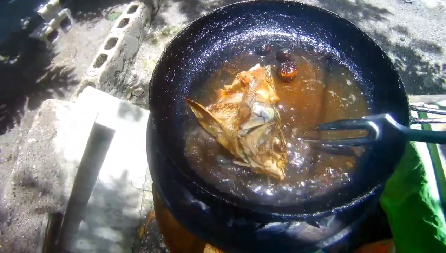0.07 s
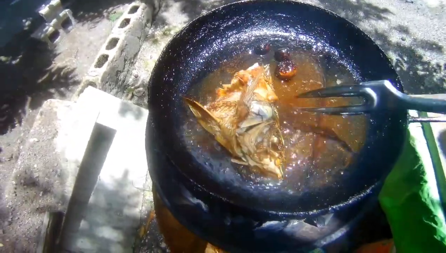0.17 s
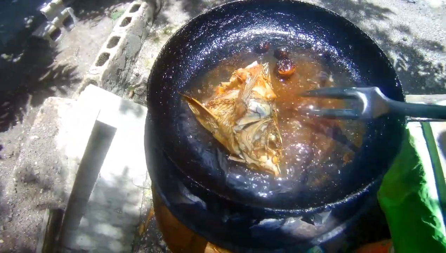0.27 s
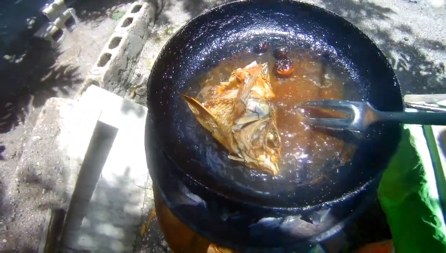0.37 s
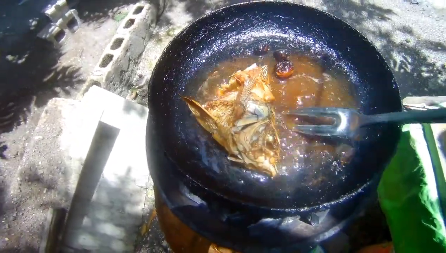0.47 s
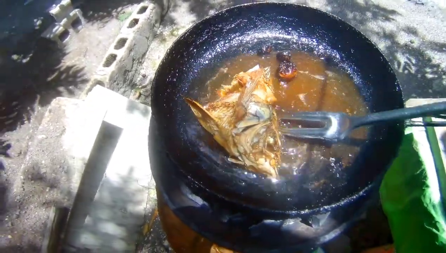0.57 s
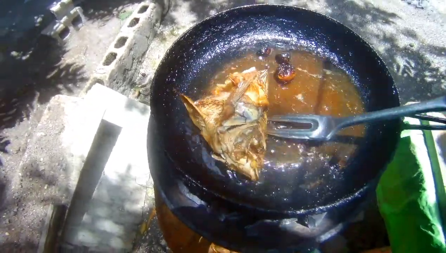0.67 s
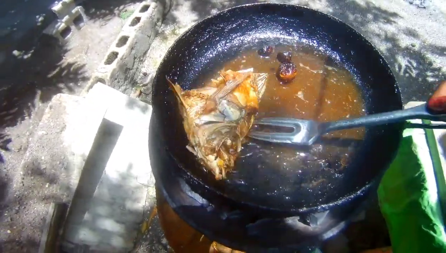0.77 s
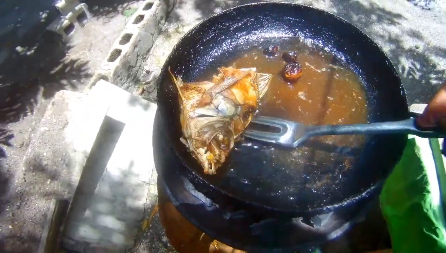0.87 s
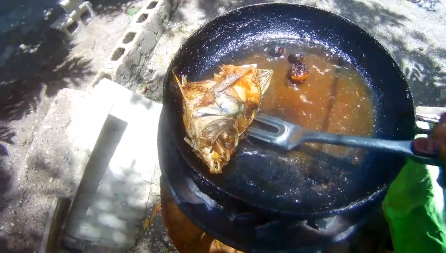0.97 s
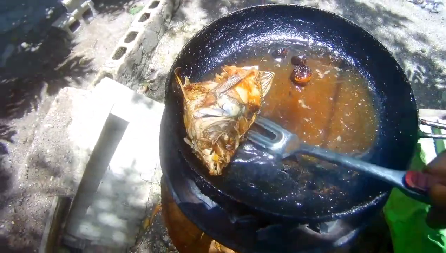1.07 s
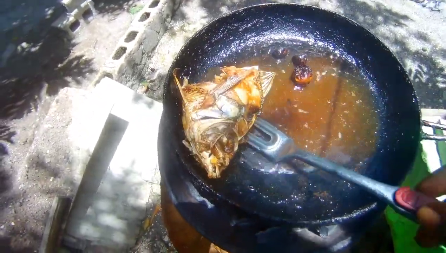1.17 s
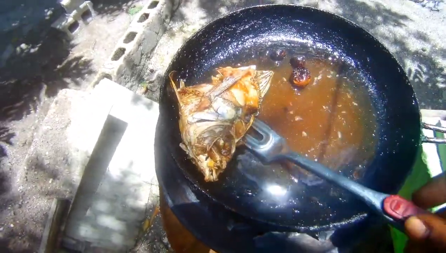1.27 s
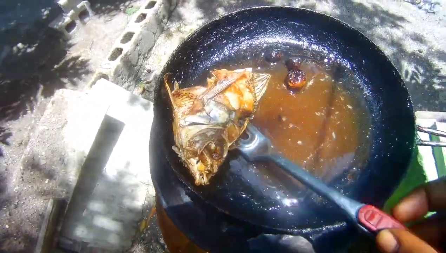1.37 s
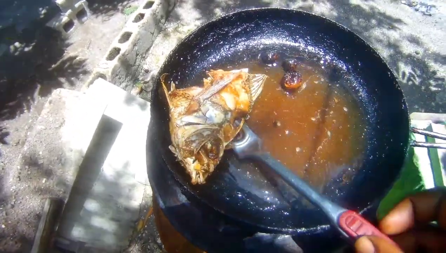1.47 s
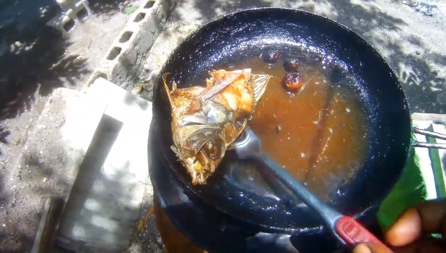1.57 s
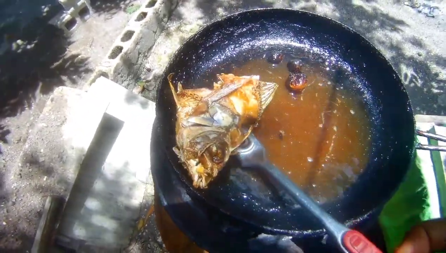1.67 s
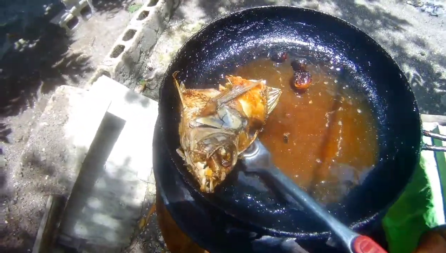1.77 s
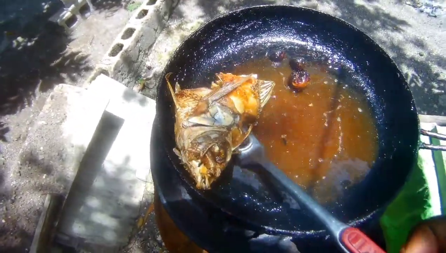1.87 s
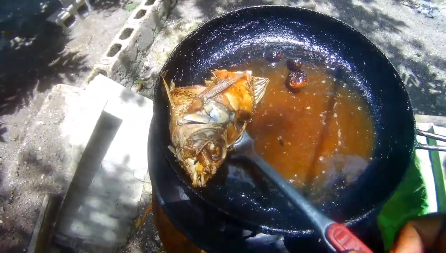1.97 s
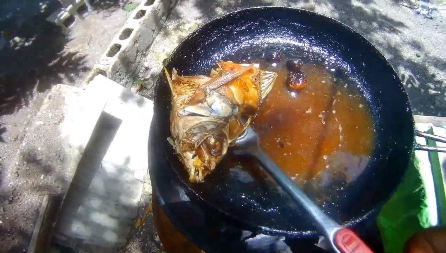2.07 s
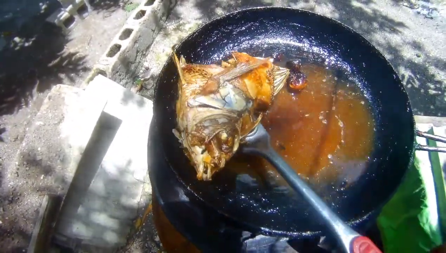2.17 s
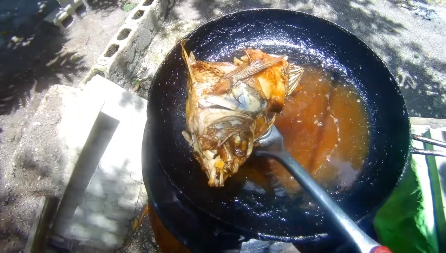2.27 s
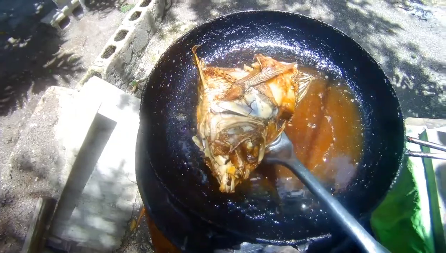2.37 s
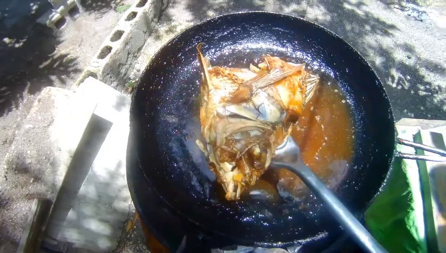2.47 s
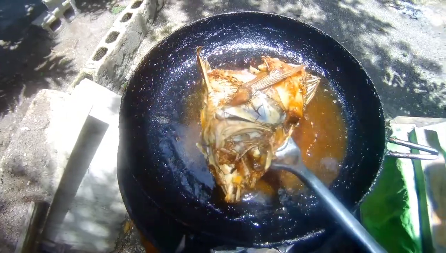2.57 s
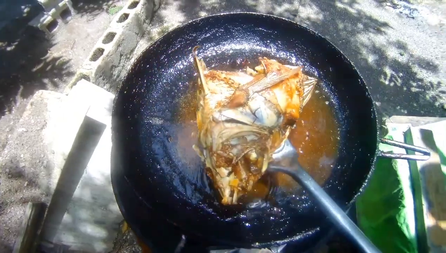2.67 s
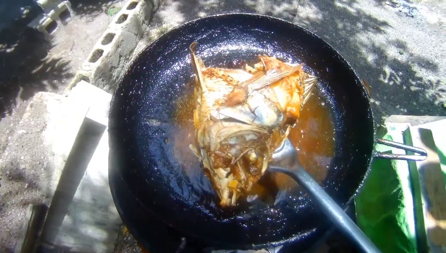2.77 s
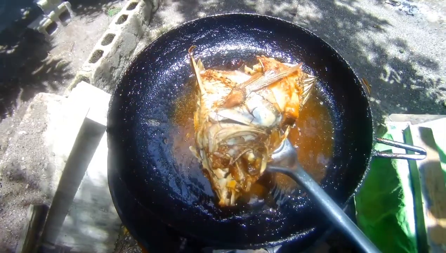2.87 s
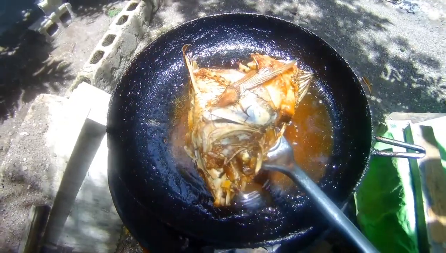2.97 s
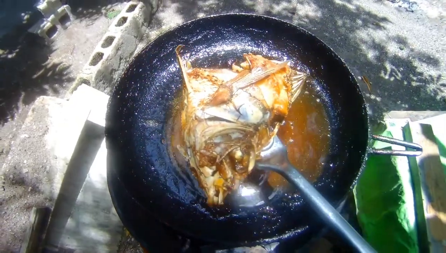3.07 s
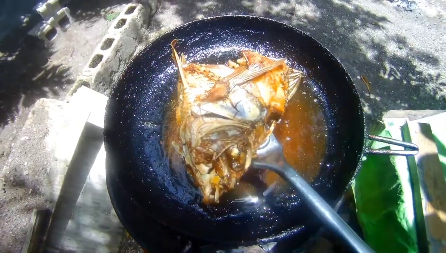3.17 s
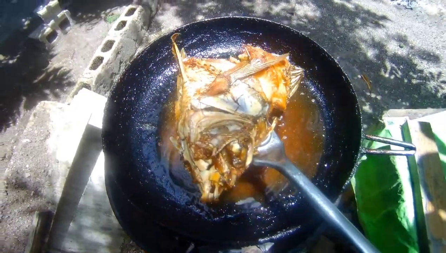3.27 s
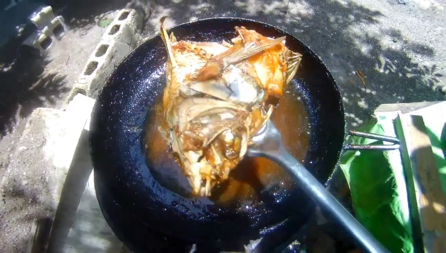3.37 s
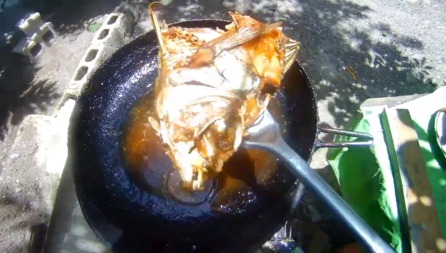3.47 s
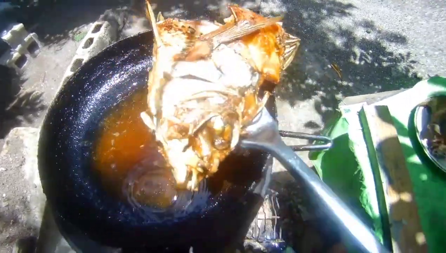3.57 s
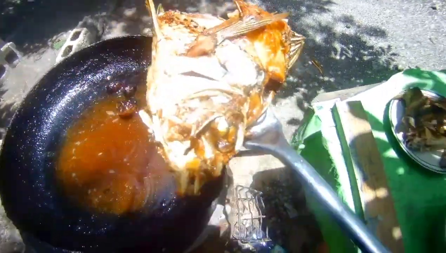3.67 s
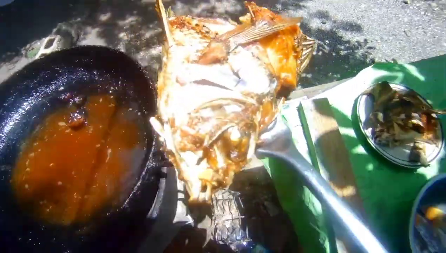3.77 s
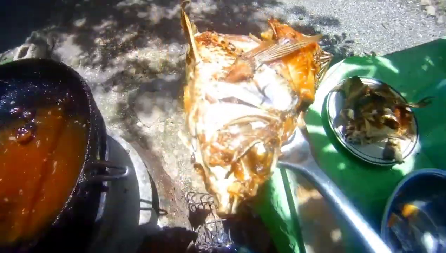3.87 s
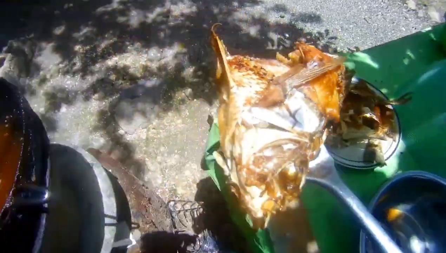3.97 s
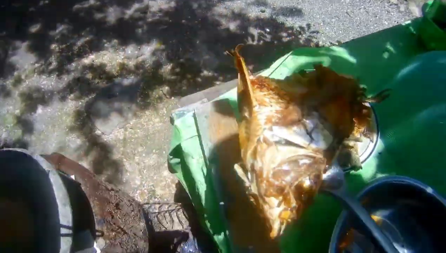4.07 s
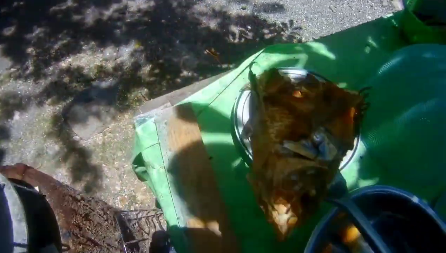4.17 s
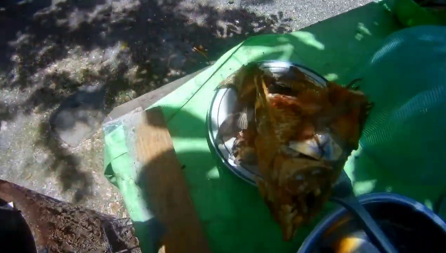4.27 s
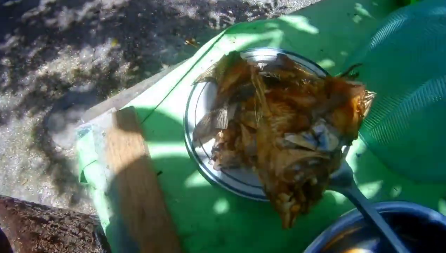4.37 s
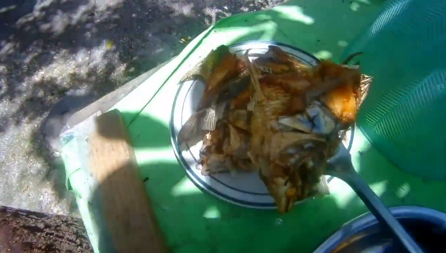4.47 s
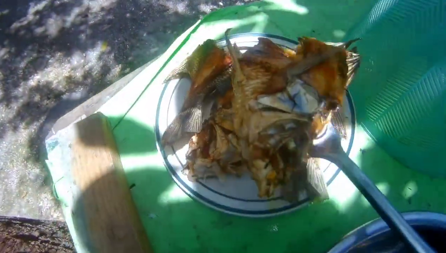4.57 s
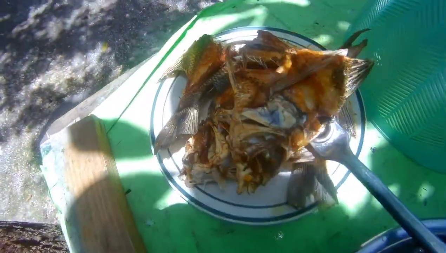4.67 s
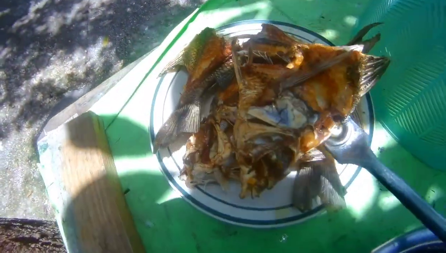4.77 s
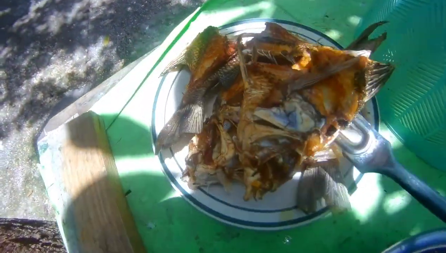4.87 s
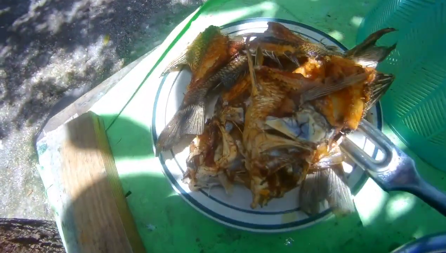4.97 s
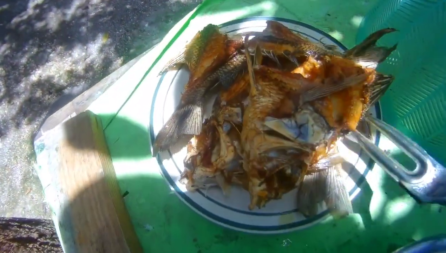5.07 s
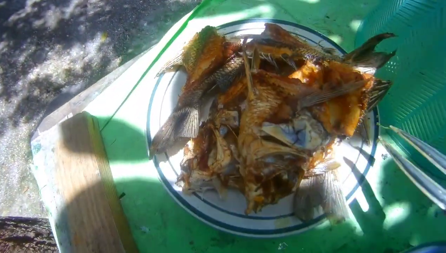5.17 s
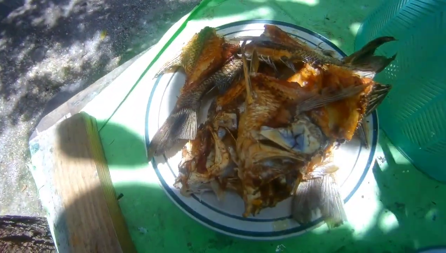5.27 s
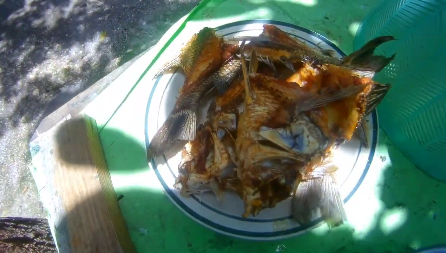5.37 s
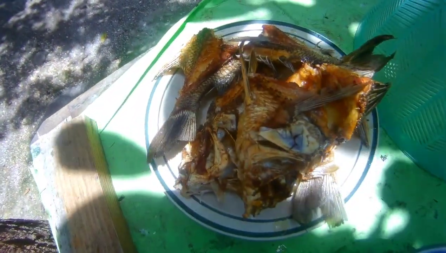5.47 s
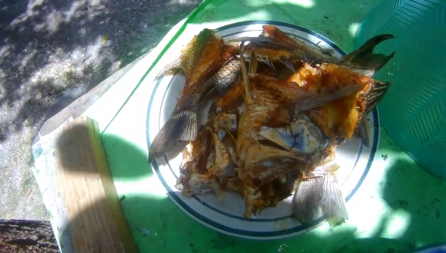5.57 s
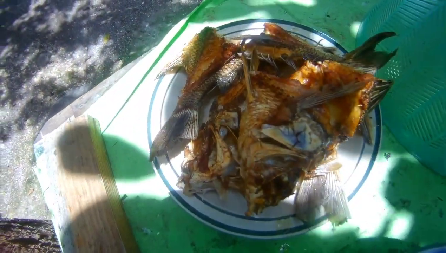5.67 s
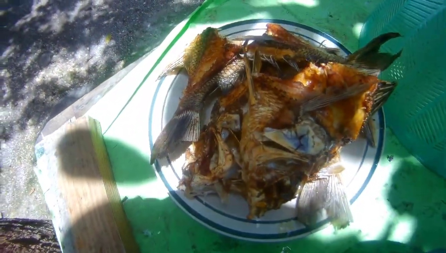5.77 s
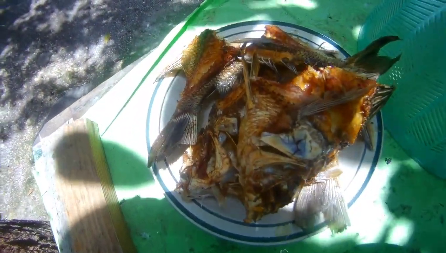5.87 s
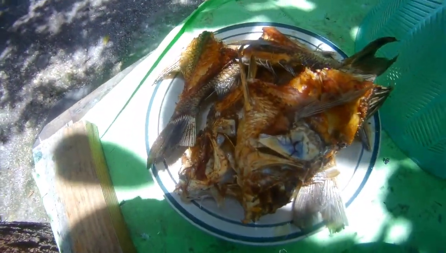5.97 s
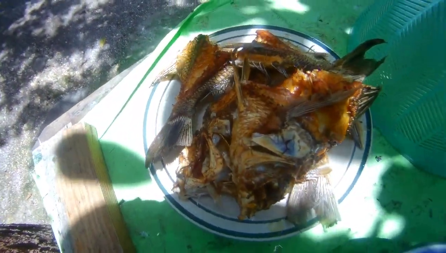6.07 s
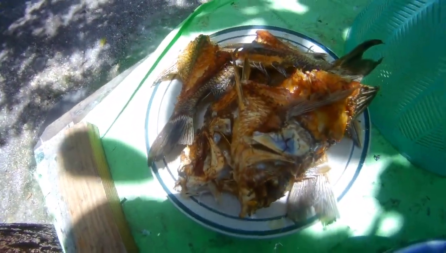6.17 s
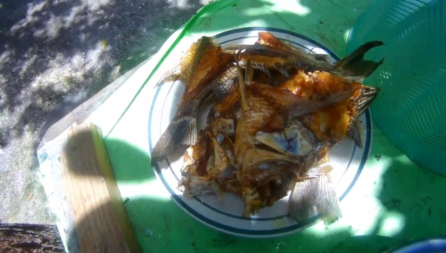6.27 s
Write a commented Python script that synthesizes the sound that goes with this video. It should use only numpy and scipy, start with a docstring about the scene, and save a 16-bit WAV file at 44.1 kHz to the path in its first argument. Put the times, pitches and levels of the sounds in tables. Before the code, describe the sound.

Close to a steel pan outdoors, hot oil fries a fish head with dense bright sizzle, sharp snaps and hollow bubbling pops. The boil weakens steadily as the fish is lifted on a fork and carried away. After a near-quiet gap with a tiny squeak, the crisp crust crunches and knocks lightly onto a plate, leaving faint open air and breeze.

```python
"""Outdoors, a fish head fries in a steel pan, is lifted out on a fork, carried away and laid on a plate.
The frying is thousands of damped sines in pitch bands, over noise; pops add snaps, cracks and hollow notes.
The plate knocks are short decaying modes with a noise rattle, and the crust crunches in the frying grains.
A faint squeak and a hum are wavering sines; the open air and the breeze's rumble are shaped noise."""
import sys
import numpy as np
from scipy import signal
from scipy.fft import rfft, irfft, next_fast_len
from scipy.io import wavfile
from scipy.ndimage import map_coordinates

SR = 44100
rng = np.random.default_rng(int(sys.argv[2]) if len(sys.argv) > 2 else 0)


def dump(signal):
    """Clip the signal to [-1, 1] and save it as 16-bit WAV at the path in sys.argv[1]."""
    limited = np.clip(np.atleast_2d(signal).T, -1, 1)
    pcm = np.round(limited * 32767).astype(np.int16)
    wavfile.write(sys.argv[1], SR, pcm)


N = 278712  # length in samples

# How hard the bubbles burst: start_s [s], big_db [dB], middle_db [dB], fine_spray_db [dB]
SIZZLE = [(0, -41.5, -31.5, -37), (.2, -39, -30.5, -37.5), (.65, -45, -39, -43), (1, -41.5, -35.5, -39),
          (1.3, -44.5, -37.5, -40), (1.47, -46.5, -37.5, -40), (1.6, -51, -43, -44),
          (1.85, -49.5, -45.5, -43), (2.2, -55.5, -47.5, -46), (2.55, -59.5, -46, -42.5),
          (2.9, -57, -48.5, -46), (3.25, -59, -49, -48.5), (3.45, -63.5, -56, -53),
          (3.8, -61.5, -57.5, -53.5), (4, -67, -58.5, -62), (4.3, -70.5, -67.5, -70),
          (5.2, -68, -64.5, -67.5), (6.32, -71, -66, -70)]
# Low gurgle in the deep oil: start_s [s], level_db [dB]
DEEP = [(0, -51), (.8, -51), (1.5, -58.5), (2.5, -61), (3.3, -62), (4, -76), (6.32, -80)]
# The crust crunches as the fish is laid down: start_s [s], middle_grain_level_db [dB]
CRUNCH = [(4.66, -65), (4.685, -54), (4.72, -49), (4.77, -51), (4.825, -46), (4.86, -57.5), (4.885, -46),
          (4.905, -57), (4.93, -48), (4.95, -56.5), (4.975, -49), (5.01, -59), (5.12, -64), (5.25, -73)]
# Pan bowl and microphone colour: pitch_hz [Hz], gain_db [dB]
BOWL_COLOUR = [(120, -20.5), (300, -21), (500, -16), (592, -8.5), (867, -12.5), (1270, -2), (1650, -4),
               (2390, -14.5), (3300, -8), (4200, 0), (6240, -7), (7200, -6.5), (8500, -23), (10800, -11.5),
               (13400, -27), (14800, -22.5), (15800, -21)]
# Loudest single bursts in the oil and cracks of the crust:
# start_s [s], snap_hz [Hz], snap_db [dB, relative], hollow_hz [Hz], hollow_db [dB]
POPS = [(.0322, 3970, -9.5, 1390, -35), (.0553, 4230, -14, 1290, -34), (.0655, 4020, -10, 1290, -30),
        (.0932, 4270, -17, 1400, -22), (.1142, 6500, -23, 1310, -11), (.1075, 4300, -10, 1270, -28),
        (.162, 4160, -10.5, 1500, -20), (.1688, 4270, -23, 1950, -13), (.2208, 5600, -19, 1320, -21),
        (.3556, 4380, -11.5, 1310, -17), (.4114, 4300, -10, 1490, -6.5), (.4653, 4500, -11.5, 1870, -37),
        (.495, 5040, -12, 610, -32), (.5277, 4200, -11.5, 1340, -9.5), (.5737, 4080, -12.5, 1410, -23),
        (.6749, 3960, -14, 1310, -32), (.7006, 4170, -15, 1340, -17), (.7328, 4200, -22, 700, -18.5),
        (.7364, 4200, -15.5, 1210, -34), (.7541, 4340, -12.5, 1770, -35), (.7953, 4690, -14, 1660, -30),
        (.8132, 4100, -24, 1750, -22), (.8369, 4080, -15, 700, -31), (.8455, 4000, -24, 1250, -16),
        (.8881, 3970, -20, 1200, -21), (.9246, 3970, -17, 1490, -27), (.9375, 4100, -26, 1600, -17),
        (.9541, 3900, -13, 1430, -22), (.9885, 4200, -26, 1930, -10.5), (1.0281, 4040, -11.5, 1700, -9.5),
        (1.0415, 4000, -24, 1500, -14), (1.0457, 3900, -19, 1600, -14), (1.1029, 3700, -15, 1640, -18),
        (1.1107, 3240, -15, 1695, -23), (1.1172, 3760, -7.5, 1500, -32), (1.1206, 4040, -7.5, 1410, -12),
        (1.1592, 4040, -12, 1230, -40), (1.2115, 4400, -10, 1750, -33), (1.2303, 4600, -11, 1550, -17),
        (1.2563, 3880, -9.5, 6200, -14), (1.2592, 4000, -21, 1500, -22), (1.2875, 4570, -9.5, 1230, -45),
        (1.2938, 4030, -14, 1220, -35), (1.3739, 3940, -12, 1650, -13), (1.4683, 5730, -19, 1160, -37),
        (1.4828, 4000, -18.5, 1280, -14.5), (1.6047, 4150, -22, 1570, -19.5),
        (1.7059, 4250, -24, 1420, -22), (1.7462, 4000, -30, 1300, -24), (1.7835, 4240, -24, 1430, -17.5),
        (1.8287, 4370, -19.5, 1530, -23), (1.8504, 4370, -18.5, 1700, -27),
        (1.8566, 4000, -17.5, 1440, -11.5), (1.9643, 5560, -20, 1480, -30), (1.9949, 3520, -28, 2050, -16),
        (2.157, 4200, -25, 1120, -28), (2.2617, 4200, -16, 1400, -17.5), (2.4851, 4000, -28, 1550, -33),
        (2.5147, 7140, -20.5, 1280, -34), (2.55, 3370, -28, 1510, -33), (2.5597, 5800, -23.5, 1500, -30),
        (2.828, 4100, -30, 1300, -28), (2.849, 4200, -25.5, 1710, -40), (2.8562, 5000, -32, 1000, -22),
        (2.8743, 6600, -21, 4520, -24), (2.9284, 4100, -23.5, 1840, -38), (3.0283, 4100, -25, 1520, -28),
        (3.0395, 6010, -20, 674, -35), (3.2297, 3950, -25, 1260, -24.5), (3.2447, 3980, -15.5, 1280, -37),
        (3.289, 4320, -28, 1130, -29), (3.3111, 7200, -26.5, 1430, -44), (3.519, 4000, -36, 1500, -29),
        (3.5457, 3500, -32.5, 1110, -26.5), (3.76, 3800, -35, 1450, -29), (3.8014, 6450, -24, 1290, -51),
        (3.8777, 3920, -28, 1370, -19.5), (4.0087, 5740, -32, 1080, -44), (4.1278, 5960, -33.5, 1890, -42),
        (4.321, 3000, -50, 1900, -32), (4.7027, 5850, -17.5, 1580, -11.5), (4.682, 3800, -49, 1800, -27),
        (4.726, 4500, -42, 1180, -22), (4.7525, 4230, -25, 1830, -40), (4.7556, 3770, -40, 1770, -18.5),
        (4.836, 5940, -35, 1500, -27), (4.9096, 4520, -16, 2010, -17.5), (4.9726, 4170, -29, 1490, -36),
        (5.1624, 6470, -24, 1820, -46), (5.4882, 5050, -37, 1450, -30), (5.618, 3620, -44, 1990, -32),
        (5.8386, 5030, -39, 840, -40), (5.9267, 6700, -32, 1630, -29), (5.9967, 4130, -41, 860, -40),
        (6.0306, 4530, -37.5, 1260, -59), (6.0887, 6360, -34, 1370, -60)]
# Dry broad clicks with no ring, as droplets flash to steam: start_s [s], level_db [dB]
SPITS = [(0.2992, -19), (0.3307, -26), (0.3564, -13), (0.4956, -20), (0.5328, -24), (0.7013, -20),
         (0.8455, -22), (0.8886, -17), (0.9357, -24), (0.9534, -22), (1.1731, -21), (1.2286, -23),
         (1.2563, -11.5), (1.2939, -17), (1.3537, -26), (1.7065, -23.5), (1.8183, -24), (1.9445, -24),
         (2.0611, -30), (2.262, -20), (2.3143, -37), (2.3846, -26.5), (2.4854, -28), (2.5826, -33),
         (2.6333, -35), (2.6983, -27), (2.8561, -28), (2.8746, -24), (3.0769, -36), (3.105, -32),
         (3.1572, -33), (3.2238, -34), (3.2883, -29), (3.3738, -37), (3.401, -38), (3.878, -22.5),
         (4.7953, -36), (4.7985, -39), (5.4874, -43), (5.6181, -46), (5.9268, -33)]
# Echoes of the pan wall: delay_s [s], level_db [dB]
WALL = [(.0031, -16), (.0052, -21), (.0085, -12.5)]
# Large slow bubbles under the fish: start_s [s], pitch_hz [Hz], level_db [dB, before trembling]
GURGLES = [(.069, 1300, -28), (.114, 1250, -26), (0.129, 1530, -24), (.216, 1250, -23), (0.218, 1780, -25),
           (0.45, 1190, -28), (0.41, 1760, -23.5), (.403, 594, -31.5), (0.492, 564, -33), (0.59, 1200, -36),
           (.772, 590, -39.5), (0.74, 740, -41), (.808, 650, -33), (.83, 600, -32.5), (.63, 1250, -35),
           (0.69, 790, -39), (1.92, 530, -48), (2, 590, -46), (1, 1950, -33), (.952, 1350, -35),
           (1.037, 1500, -26.5), (1.035, 1300, -33), (1.1, 1400, -38), (3, 910, -51), (2.06, 590, -46)]
# Fish and fork meet the plate: start_s [s], strength_db [dB]
KNOCKS = [(4.7029, -26.5), (4.9096, -28.5)]
# Plate modes, damped by the food: pitch_hz [Hz], level_db [dB, before scatter], t60_s [s]
PLATE = [(109.5, -40, .04), (390, -44, .02), (980, -12, 0.018), (2880, -3.5, 0.0091)]
# Hum path: start_s [s], pitch_hz [Hz], level_db [dB], both before wavering
HUM = [(4.25, 235.6, -87), (4.4, 235, -74), (4.55, 236, -69), (4.73, 235.7, -61.5), (4.98, 238, -66),
       (5.15, 244, -90)]
# Squeak path while the fish is carried: start_s [s], pitch_hz [Hz], level_db [dB], both before wavering
SQUEAK = [(4.35, 1805, -82), (4.372, 1720, -65), (4.43, 1730, -70), (4.47, 1646, -76.5), (4.483, 1640, -51),
          (4.505, 1650, -80)]
# Open-air spectrum: pitch_hz [Hz], relative_level_db [dB per Hz]
AIR = [(60, -10), (170, 1), (335, -2), (656, -6.5), (1520, -14), (2300, -18.5), (2650, -4.5), (3400, -35),
       (4380, -12), (6840, -11), (8090, -15), (10700, -24), (15800, -15.5)]
# Breeze on the microphone: start_s [s], level_db [dB, before wavering]
BREEZE = [(0, -61.5), (1, -67.5), (3.5, -70), (3.72, -69.5), (3.9, -64), (4.05, -67), (4.14, -73),
          (4.58, -75), (4.76, -64), (5.1, -73), (5.8, -73), (5.85, -62), (5.93, -78), (6.07, -68),
          (6.2, -75), (6.32, -64)]

CRUNCH_BIG_DB, CRUNCH_FINE_DB = -6, -8  # over the middle grains
THICKENS = 0.077  # dB of spray over the bubbles for each dB of fiercer boil
MASKING = 0.19  # dB the small bursts lose against the bubbles for each dB of fiercer boil
SMALL_SNAP_DB, SMALL_HOLLOW_DB = 15.5, 3  # over the middle bubbles; over the big ones
SMALL_SPREAD_DB = 8  # small bursts fall up to this far below
CRACK_DB, CRACK_SPREAD_DB = -6.5, 8  # over the snap's table level; scatter downward
CRACK_TOP_HZ = 8000  # cracks and spits soften above this
SMALL_SPIT_DB, SPIT_SPREAD_DB = 6, 4  # over the middle bubbles; scale of the upward scatter
SPIT_COLOUR = 0.79  # share of the bowl's colour, in dB
LEAVES_PAN_S = 3.7  # wall echoes are fed until here
RATTLE_DB, RATTLE_T60_S = 2, 0.046  # the crust shakes after a knock
SQUEAK_UPPER, SQUEAK_UPPER_DB = 2.4, -8  # second partial: pitch ratio, level over the first
AIR_DB = -66  # RMS level
TOP_HZ = 15900  # band limit


def sizzle():
    """Three bubble sizes and the deep gurgle, heard through the bowl; they boil up together."""
    boil = 0.7 * wobble(70) + 0.87 * wobble(190)  # dB, before each size's share
    # Droplets click at all pitches at once, over a hiss too dense to count
    hiss, drops = rng.standard_normal((2, N))
    uneven = amp(3 * rng.standard_normal(N))
    lands = rng.random(N) < 500 / SR  # about 500 droplets a second
    spray = hiss + .9 * unit(drops * uneven * lands)

    big = bubbles(956, 2550, cycles=2.0, spread_db=13.0, hiss=0.88, spray=spray, count=5000, size=600)
    middle = bubbles(2516, 9150, cycles=6.0, spread_db=13.5, hiss=0.99, spray=spray, count=5000, size=260)
    fine = bubbles(7940, 22800, cycles=1.26, spread_db=2.0, hiss=0.85, spray=spray, count=6000, size=130)
    deep = bubbles(246, 941, cycles=4, spread_db=7.5, hiss=0.89, spray=spray, count=1500, size=1500)
    deep *= amp(1.1 * boil + 0.9 * wobble(30))
    big *= amp(1.55 * boil + 1.07 * wobble(40))
    middle *= amp(0.95 * boil + 0.99 * wobble(45))
    fine *= amp(1.36 * boil + 1.93 * wobble(24.64))

    coloured = filtered(np.array([big, middle, fine, deep]), causal(BOWL_COLOUR))
    gains = [*levels(), *amp(curves(DEEP))]
    return sum(gain * unit(x) for gain, x in zip(gains, coloured))


def bubbles(lo_hz, hi_hz, cycles, spread_db, hiss, spray, count, size):
    """Many bursts of random pitch and size, over their share of the spray, which thickens with the boil."""
    u = rng.random((count, 4))
    start_s = u[:, 0] * (N - 1) / SR
    hz = lo_hz * (hi_hz / lo_hz) ** u[:, 1]
    life = cycles * 3 ** (u[:, 2] - .5)
    gain = hz * amp(spread_db * u[:, 3] ** 2) / np.sqrt(life)  # equal energy per Hz
    grains = unit(rings(start_s, hz, gain, life, size))
    boil_db = curves(SIZZLE)[1]
    dense = unit(filtered(spray, lambda f: (f > lo_hz) & (f < hi_hz)))
    return grains + hiss * amp(THICKENS * (boil_db - boil_db.mean())) * dense


def levels():
    """Gain of big, middle and fine grains: frying and crunch add their power."""
    crunch_db, = curves(CRUNCH)
    size_db = np.array([[CRUNCH_BIG_DB], [0], [CRUNCH_FINE_DB]])
    return np.hypot(amp(curves(SIZZLE)), amp(crunch_db + size_db))


def pops():
    """Ringing snaps, broad cracks, hollow cavity notes and dry spits, echoed by the wall while in the pan."""
    s, snap_hz, snap_db, hollow_hz, hollow_db = np.transpose([*POPS, *small_pops(count=130)])
    ones = np.ones(len(s))
    snap = rings(s, snap_hz, amp(snap_db + 1), 3.7 * ones, size=500)
    spit_s, spit_db = np.transpose([*SPITS, *small_spits(count=450)])
    crack_db = snap_db + CRACK_DB - CRACK_SPREAD_DB * rng.random(len(s))
    crack = cracks(s, amp(crack_db)) + cracks(spit_s, amp(spit_db))
    hollow = rings(s, hollow_hz, amp(hollow_db), 0.86 * ones, size=1200)
    burst = snap + crack + hollow
    in_pan = np.arange(N) < LEAVES_PAN_S * SR

    def wall(f):
        """The pan wall returns a few delayed, weaker copies."""
        return sum(amp(level) * np.exp(-2j * np.pi * f * delay) for delay, level in WALL)

    # A tiny source radiates no bass
    small = signal.butter(3, 450 / SR * 2, "high", output="sos")
    return signal.sosfilt(small, burst + filtered(burst * in_pan, wall))


def small_pops(count):
    """Rows like POPS at random moments, their strength following the sizzle around them."""
    u = rng.random((count, 5))
    big_db, middle_db, _ = 20 * np.log10(levels()[:, (u[:, 0] * N).astype(int)])
    lost_db = MASKING * (middle_db - middle_db.mean())
    start_s = u[:, 0] * N / SR
    snap_hz = 3700 * 1.44 ** (u[:, 1] ** 2)
    snap_db = middle_db - lost_db + SMALL_SNAP_DB - SMALL_SPREAD_DB * u[:, 2]
    hollow_hz = 1100 * 2.1 ** u[:, 3]
    hollow_db = big_db - lost_db + SMALL_HOLLOW_DB - SMALL_SPREAD_DB * u[:, 4]
    return np.transpose([start_s, snap_hz, snap_db, hollow_hz, hollow_db])


def small_spits(count):
    """Rows like SPITS at random moments; a few are much larger."""
    u = rng.random((count, 2))
    middle_db = 20 * np.log10(levels()[1, (u[:, 0] * N).astype(int)])
    middle_db = middle_db - MASKING * (middle_db - middle_db.mean())
    start_s = u[:, 0] * (N - 1) / SR
    level_db = middle_db + SMALL_SPIT_DB - SPIT_SPREAD_DB * np.log(1 - .95 * u[:, 1])
    return np.transpose([start_s, level_db])


def cracks(s, gain):
    """Single pressure spikes of peak gain, coloured by bowl and microphone."""
    colour = causal([(hz, SPIT_COLOUR * db) for hz, db in BOWL_COLOUR])
    impulse = np.arange(N) == 0
    spike = filtered(impulse, lambda f: colour(f) / (1 + 1j * f / CRACK_TOP_HZ) ** 2)[:SR // 50]
    clicks = np.bincount(np.round(s * SR).astype(int), gain, N)[:N]
    return -signal.fftconvolve(clicks, spike / np.abs(spike).max())[:N]


def gurgles():
    """A large cavity rings for many cycles, its level trembling."""
    s, hz, db = np.transpose(GURGLES)
    return rings(s, hz, amp(db), 11.0 * np.sqrt(hz / 1000), size=5000) * amp(3.1 * wobble(300))


def knocks():
    """Every knock briefly rings the loaded plate, with a low thud, and leaves a short broad rattle."""
    out, rattle = np.zeros(N + SR), np.zeros(N + SR)
    t = np.arange(SR // 5) / SR
    for s, db in KNOCKS:
        hit = slice(round(s * SR), round(s * SR) + len(t))
        for hz, level, t60 in PLATE:
            mode_db = level + rng.normal(0, 1.5) - 60 * t / t60  # each hit excites the modes differently
            out[hit] += amp(db) * amp(mode_db) * np.sin(2 * np.pi * hz * t)
        rattle[hit] += amp(db + RATTLE_DB - 60 * t / RATTLE_T60_S) * rng.standard_normal(len(t))
    return out[:N] + filtered(rattle[:N], causal(BOWL_COLOUR))


def hum():
    """A faint sine wavering in pitch and level, like an insect passing."""
    hz, db = curves(HUM)
    return amp(db + 1.1 * wobble(31)) * np.sin(2 * np.pi * np.cumsum(hz + 0.58 * wobble(15)) / SR)


def squeak():
    """A thin uneven squeak with one upper partial."""
    hz, db = curves(SQUEAK)
    phase = 2 * np.pi * np.cumsum(hz + 25 * wobble(140)) / SR
    t = np.arange(N) / SR
    heard = (t > SQUEAK[0][0]) & (t < SQUEAK[-1][0])
    partials = np.sin(phase) + amp(SQUEAK_UPPER_DB) * np.sin(SQUEAK_UPPER * phase)
    return heard * amp(db + 2.5 * wobble(200)) * partials


def air():
    """Distant outdoor noise, and a breeze rumbling on the microphone."""
    noise = filtered(rng.standard_normal(N), lambda hz: amp(along(AIR, hz)))
    rumble_shape = [(18, -16), (42, -3.5), (80, -8), (200, -13), (900, -34)]  # (Hz, dB)
    rumble = filtered(rng.standard_normal(N), lambda hz: amp(along(rumble_shape, hz)))
    breeze_db = curves(BREEZE)[0] + 2.8 * wobble(10)
    return amp(AIR_DB) * unit(noise) + amp(breeze_db) * unit(rumble)


def rings(s, hz, gain, cycles, size):
    """Damped sines swell in a cycle, fall to 1/e in so many cycles; pitch rises as the cavity closes."""
    turns = hz[:, None] * np.arange(size) / SR
    shape = (1 - np.exp(-1.2 * turns)) * np.exp(-turns / cycles[:, None])
    wave = gain[:, None] * shape * np.sin(2 * np.pi * turns * (1 + 0.001 * turns))
    at = np.round(s * SR).astype(int)[:, None] + np.arange(size)
    return np.bincount(at.ravel(), wave.ravel(), N + size)[:N]


def amp(db):
    """Decibels to amplitude."""
    return 10 ** (np.asarray(db) / 20)


def unit(x):
    """Scale to an RMS of one."""
    return x / np.sqrt(np.mean(x ** 2) + 1e-20)


def along(points, hz):
    """Interpolate (Hz, value) points on a log axis."""
    f, v = np.transpose(points)
    return np.interp(np.log(hz + 1), np.log(f + 1), v)


def curves(rows):
    """One value per sample for each column after the time."""
    s, *cols = np.transpose(rows)
    return [np.interp(np.arange(N) / SR, s, c) for c in cols]


def wobble(rate):
    """A smooth random curve, rate knots a second."""
    knots = rng.standard_normal(int(N * rate / SR) + 4)
    return map_coordinates(knots, [np.arange(N) * rate / SR])


def filtered(x, response):
    """Filter x by a complex response of frequency, padded so tails do not wrap around."""
    m = 2 * next_fast_len(N // 2 + SR // 4)
    return irfft(rfft(x, m) * response(np.fft.rfftfreq(m, 1 / SR)), m)[..., :N]


def causal(points):
    """The minimum-phase response with the gain of (Hz, dB) points."""
    def response(hz):
        ceps = irfft(np.log(amp(along(points, hz))))
        # Fold the cepstrum forward in time
        ceps[1:len(hz) - 1] *= 2
        ceps[len(hz):] = 0
        return np.exp(rfft(ceps))
    return response


def scene():
    """One microphone feeds both channels."""
    mono = sizzle() + pops() + gurgles() + knocks() + hum() + squeak() + air()
    return np.tile(mono, (2, 1))


def record(dry):
    """Nothing passes above the band limit."""
    return filtered(dry, lambda hz: hz < TOP_HZ)


dry = scene()
out = record(dry)
dump(out)
```